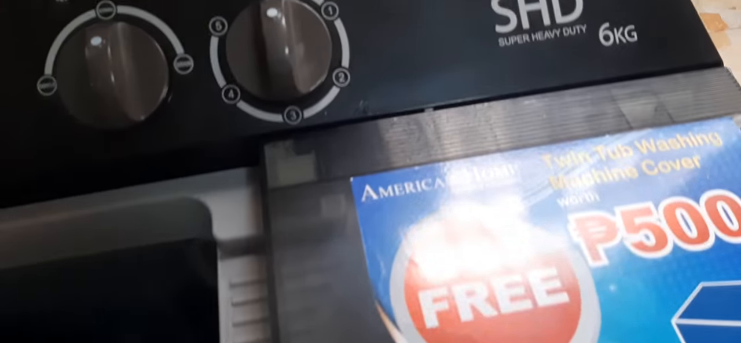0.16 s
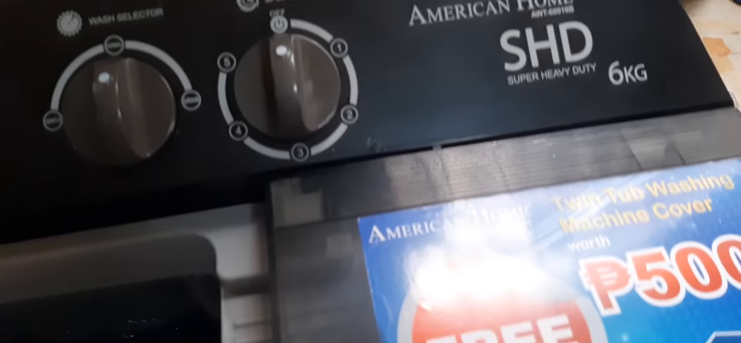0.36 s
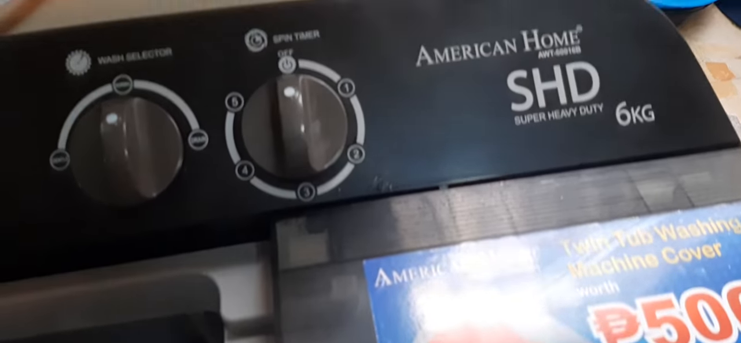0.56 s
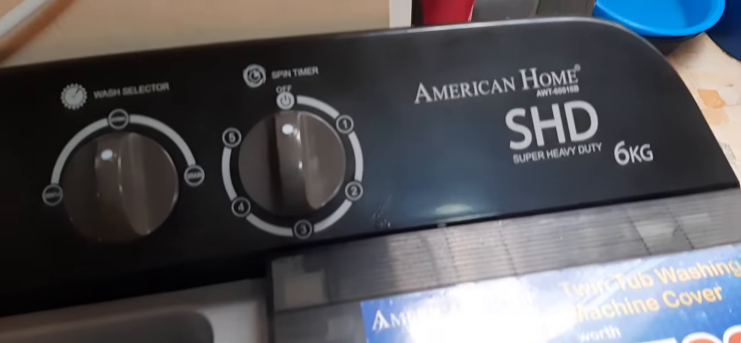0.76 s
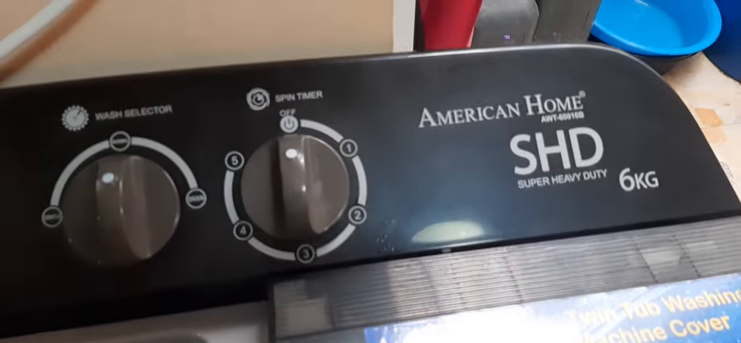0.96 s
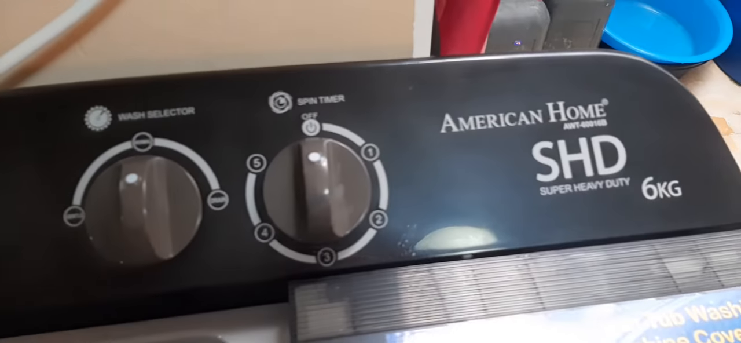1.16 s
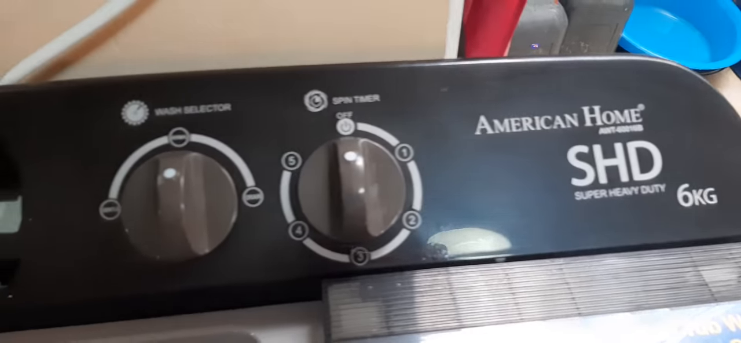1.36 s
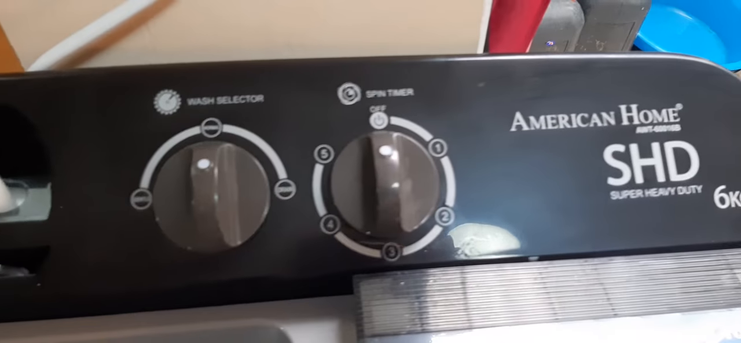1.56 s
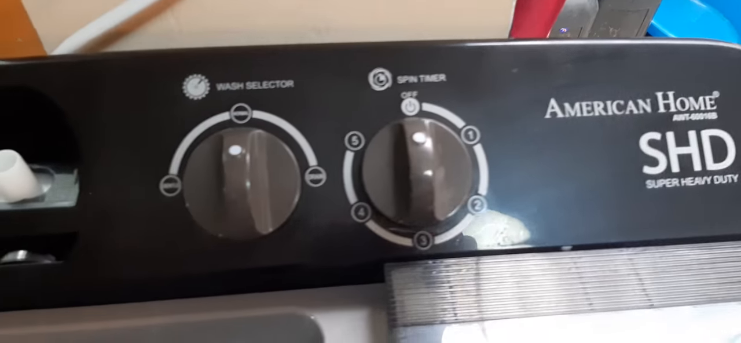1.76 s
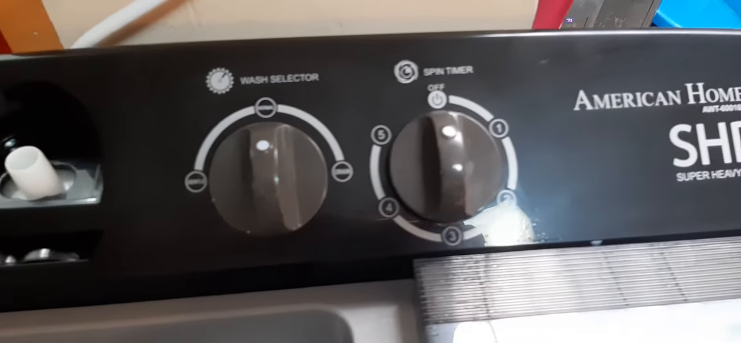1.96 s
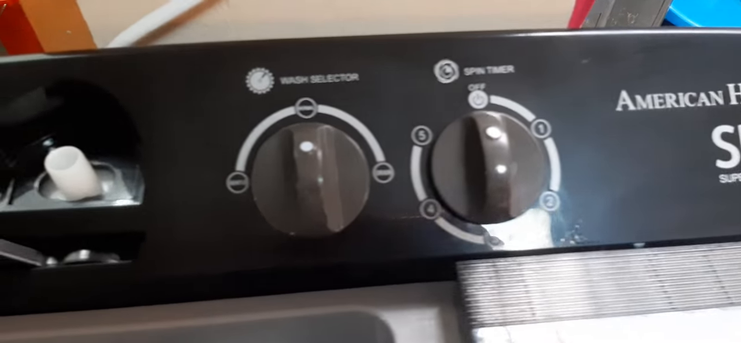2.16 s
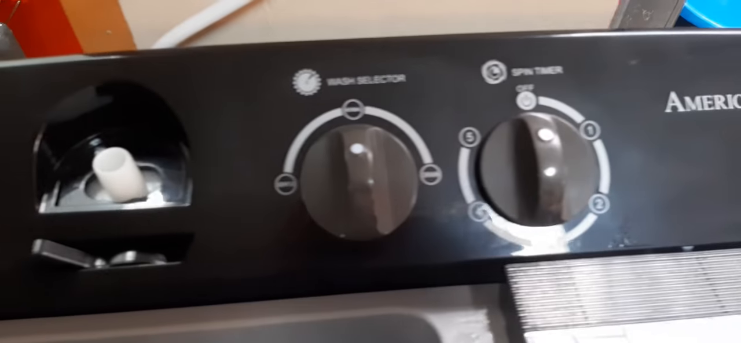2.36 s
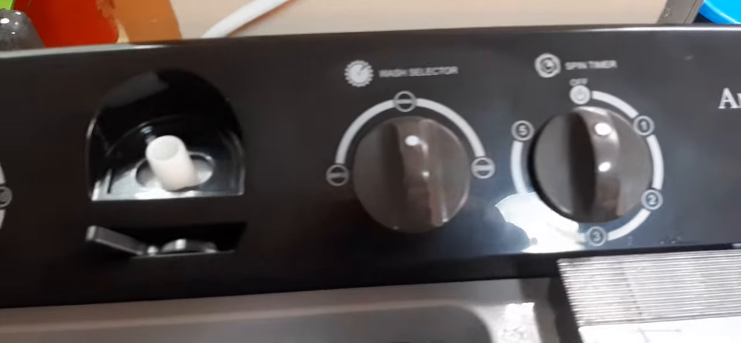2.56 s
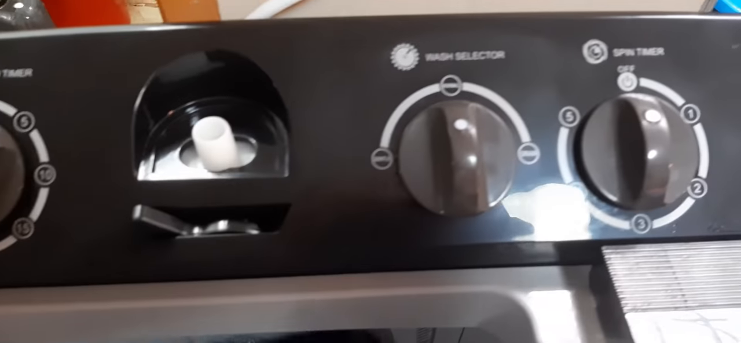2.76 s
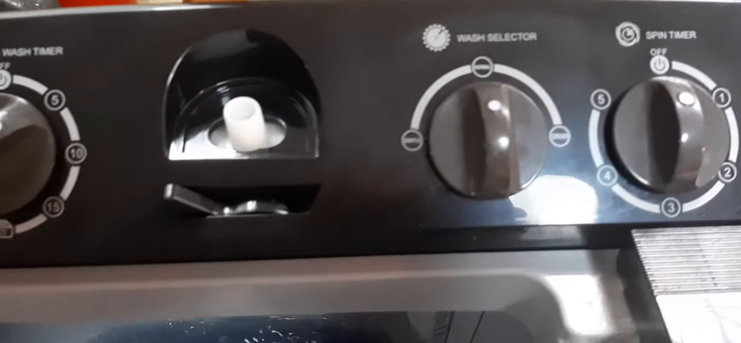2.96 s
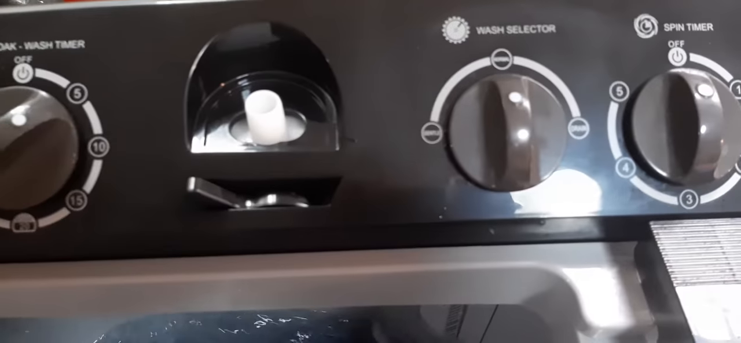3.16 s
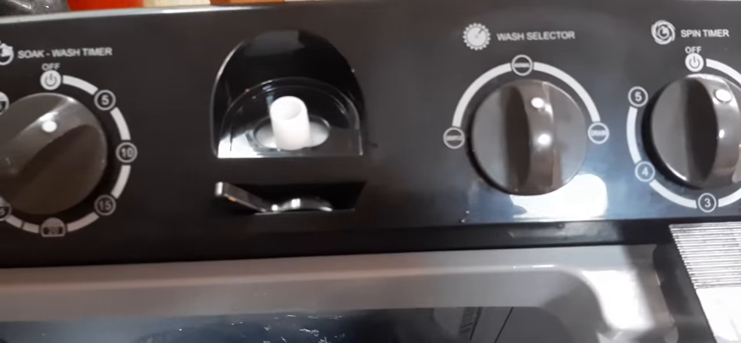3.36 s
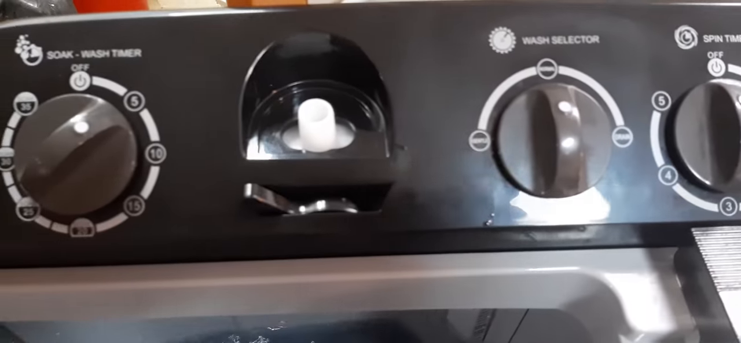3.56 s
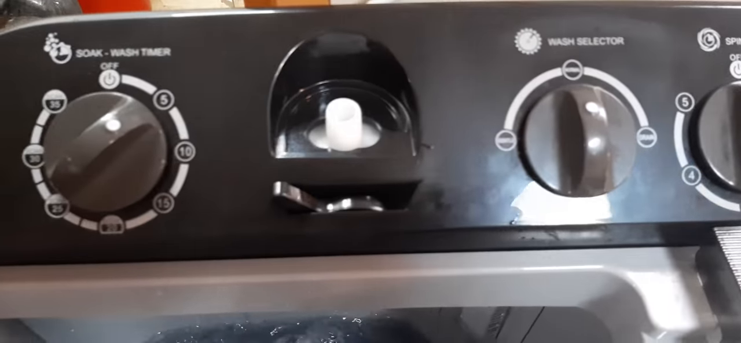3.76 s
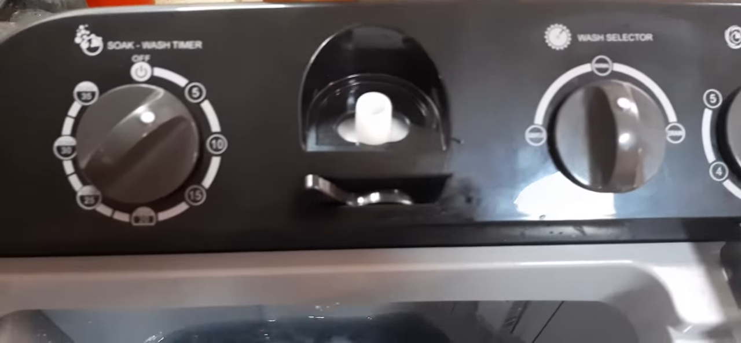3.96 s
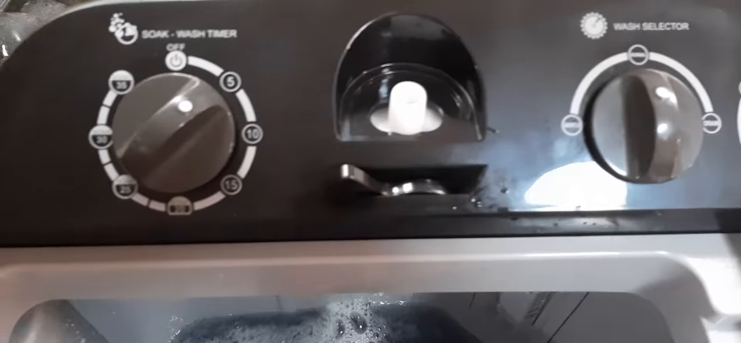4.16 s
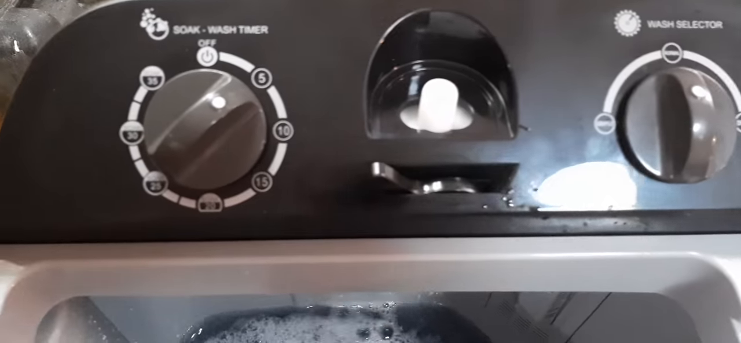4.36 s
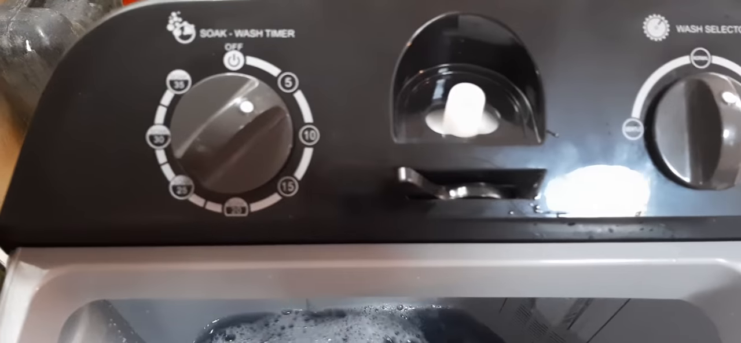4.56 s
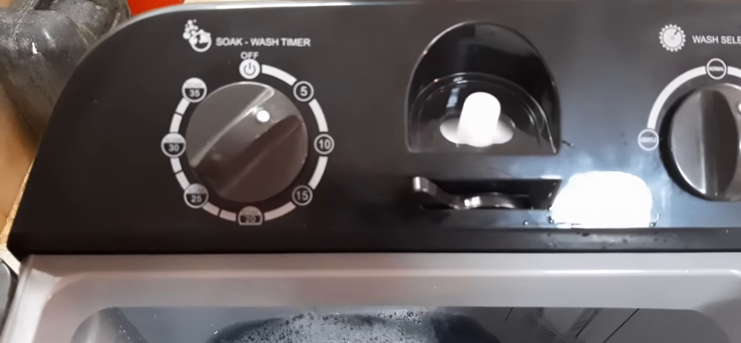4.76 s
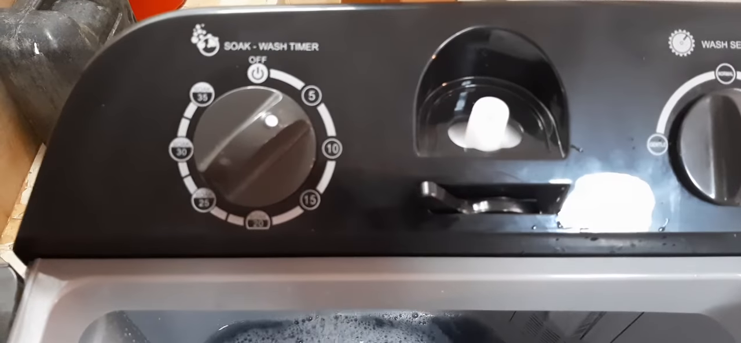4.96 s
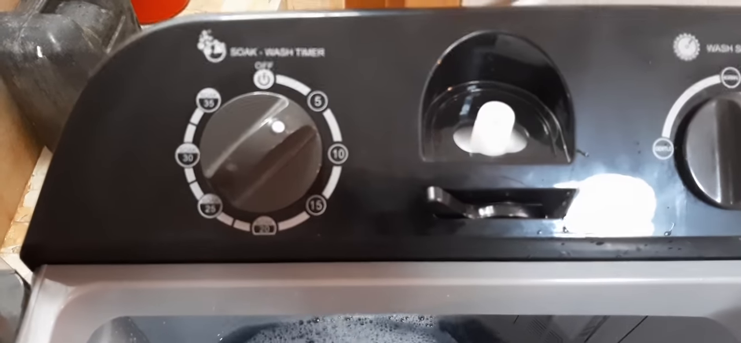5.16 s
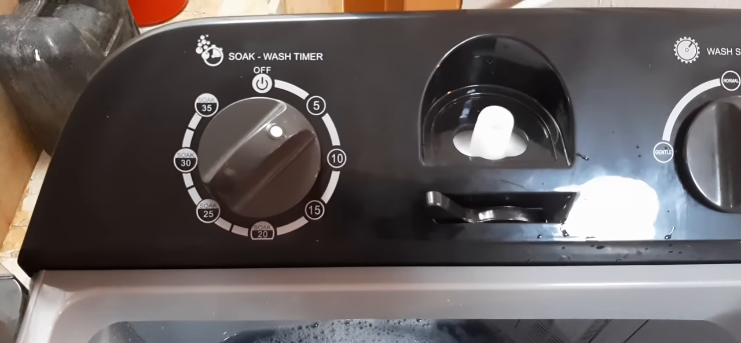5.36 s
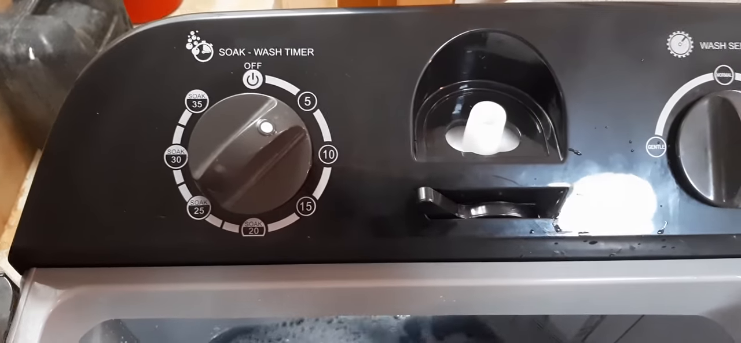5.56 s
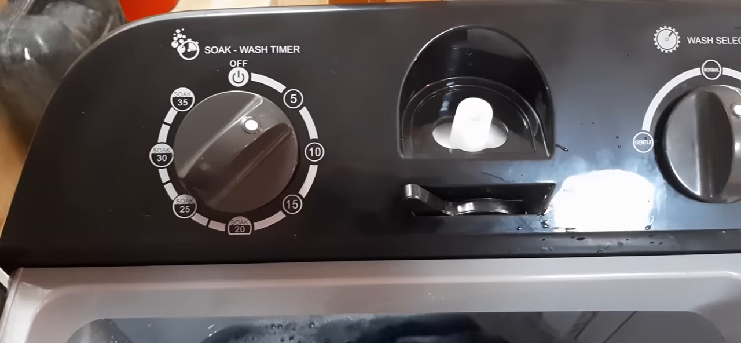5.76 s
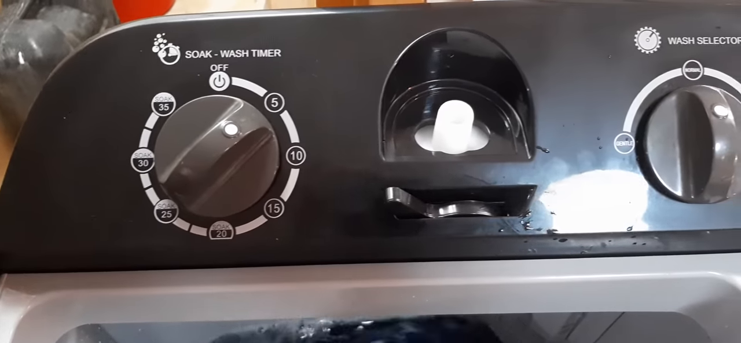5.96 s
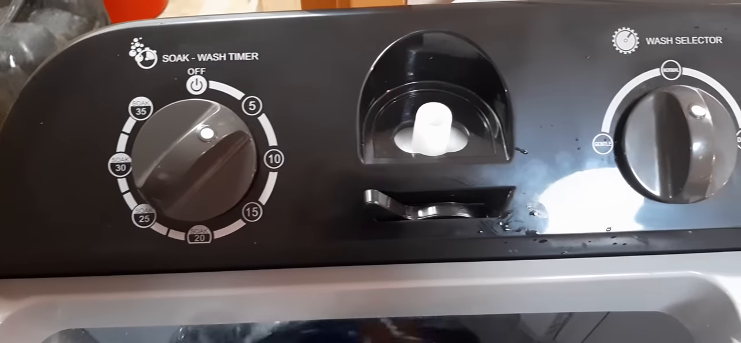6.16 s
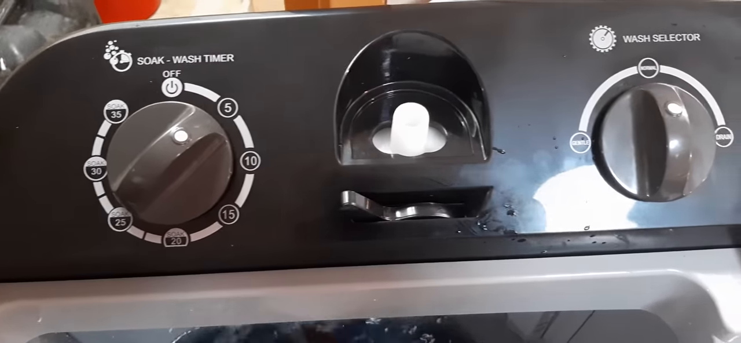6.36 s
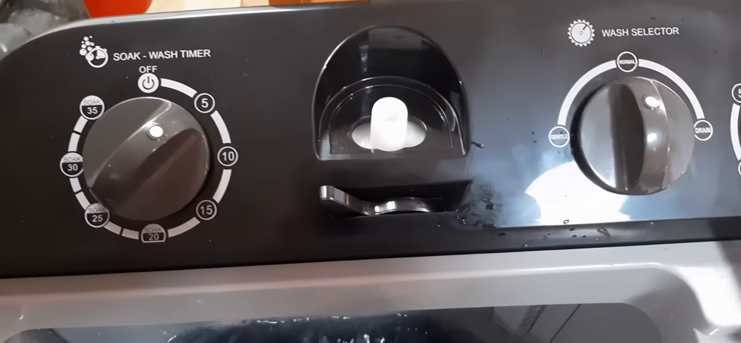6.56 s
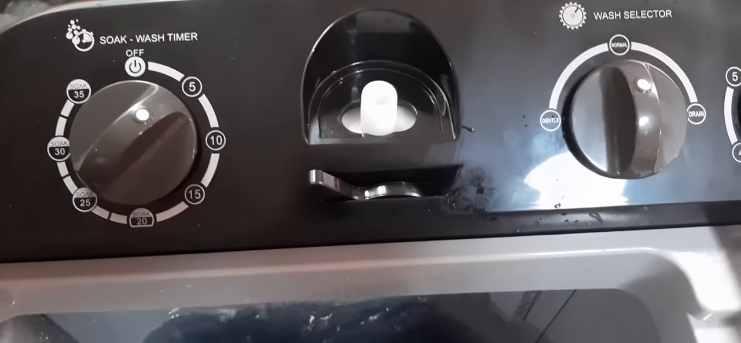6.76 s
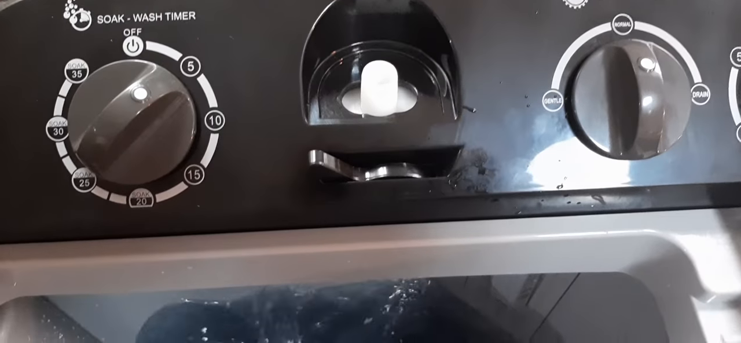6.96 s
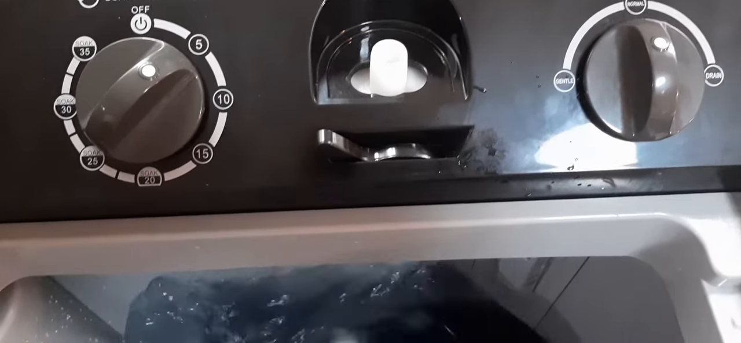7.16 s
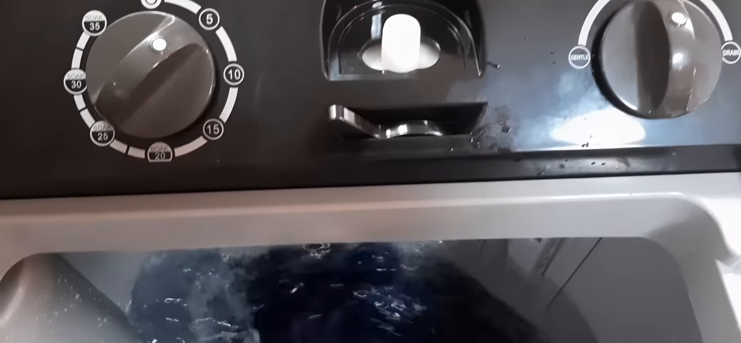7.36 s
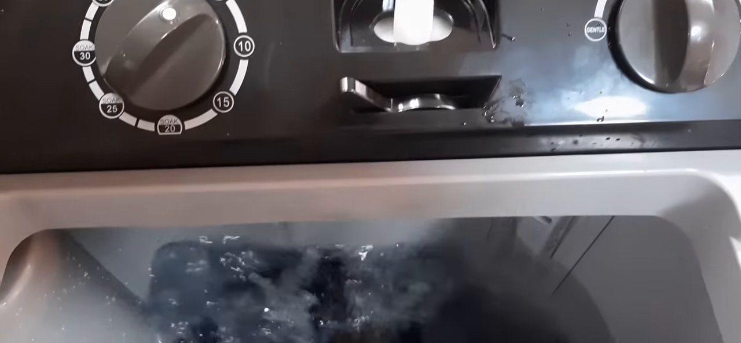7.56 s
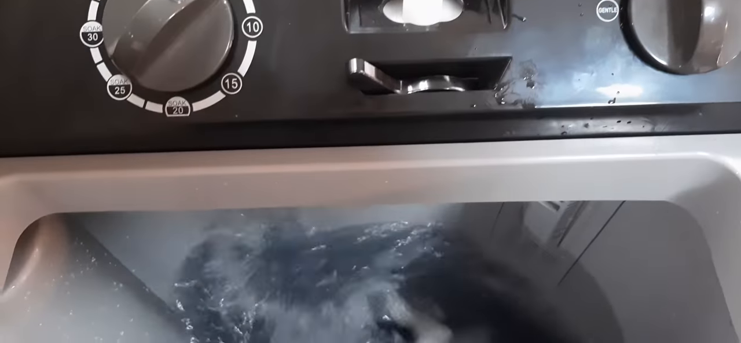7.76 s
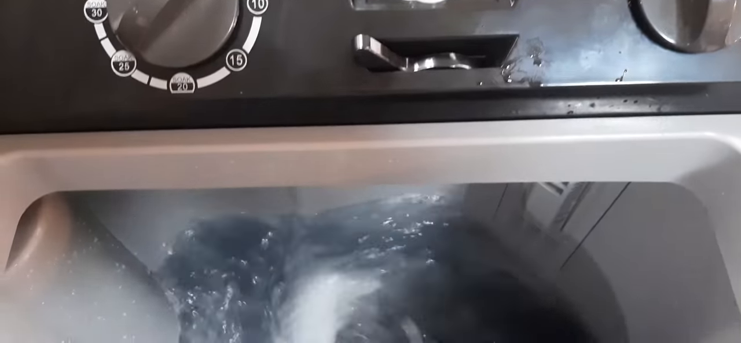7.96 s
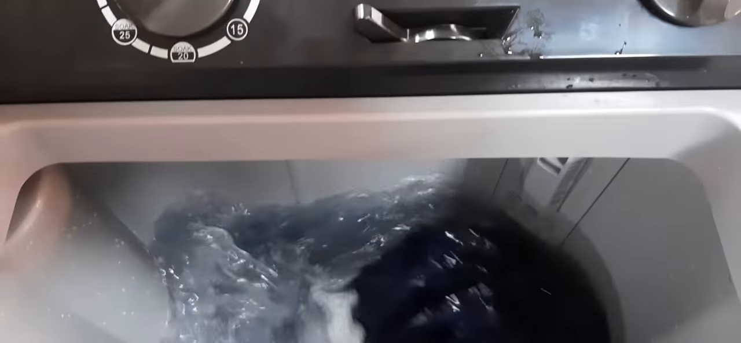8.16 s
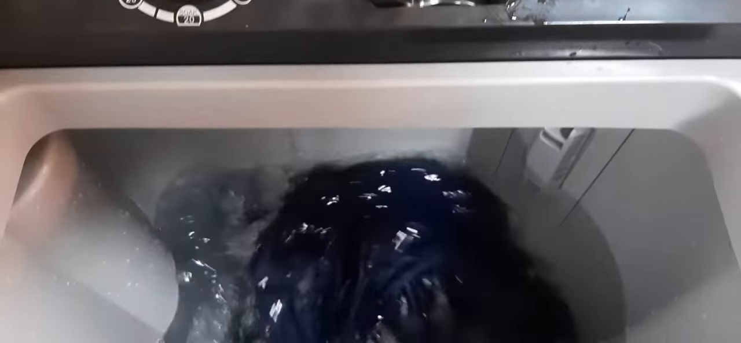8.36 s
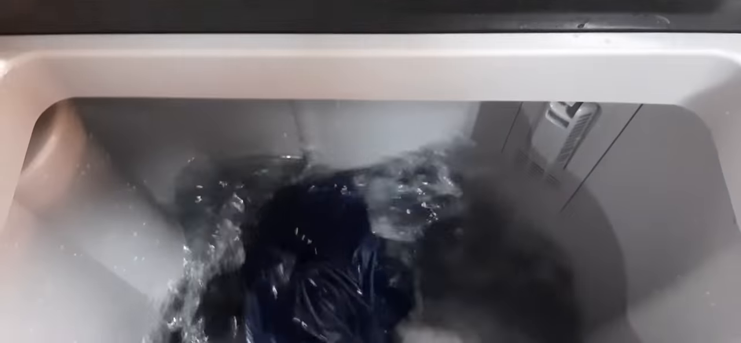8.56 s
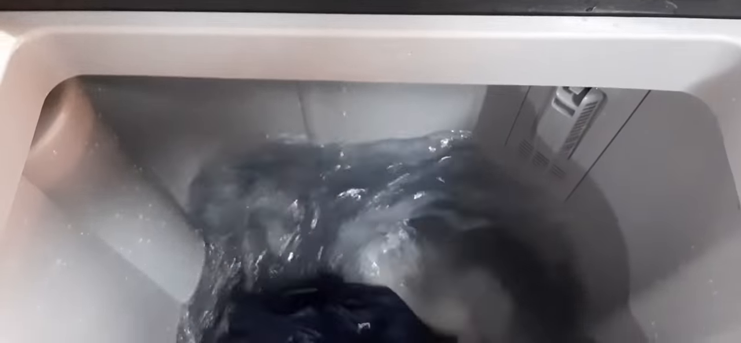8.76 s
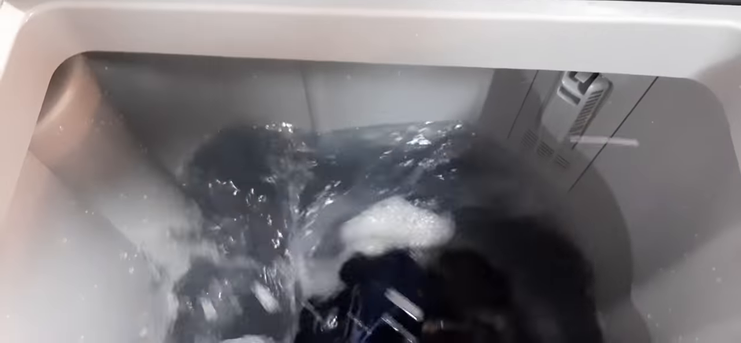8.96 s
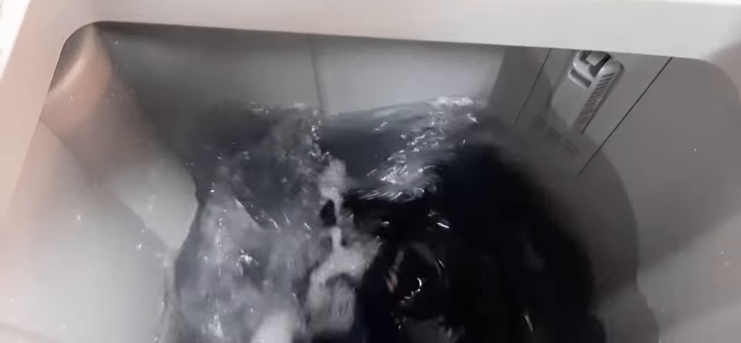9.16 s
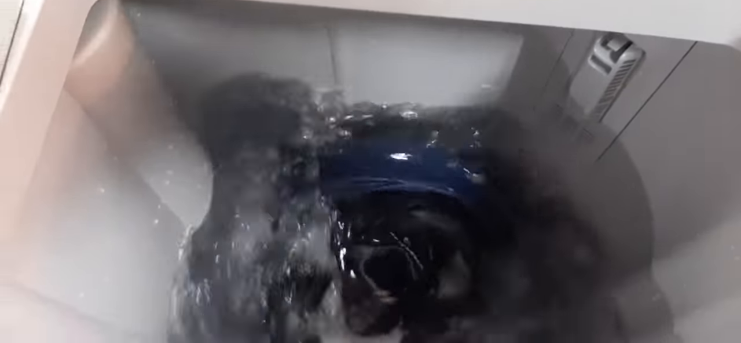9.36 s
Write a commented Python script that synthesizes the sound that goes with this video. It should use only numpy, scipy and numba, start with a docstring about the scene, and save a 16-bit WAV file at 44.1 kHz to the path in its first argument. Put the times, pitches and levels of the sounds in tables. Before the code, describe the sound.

Sudsy water slaps and gurgles above a low throbbing motor, settles during a ticking pause, then the motor restarts and the churn grows heavy and close.

```python
"""Laundry: a top-loading washing machine heard from just above its panel. The motor, summed sines at twice the
mains rate with sidebands, hums and throbs; it stops, the water (damped sine bubbles over shaped noise)
settles over the ringing ticks of a spring timer. The motor then starts the other way and the water builds
up to a splashing churn as the microphone tips down into the tub. Cabinet boom and room air are shaped noise."""
import sys
import numpy as np
from scipy import signal
from scipy.fft import rfft, irfft, next_fast_len
from scipy.io import wavfile
from scipy.ndimage import uniform_filter1d
from numba import njit

SR = 44100
rng = np.random.default_rng(int(sys.argv[2]) if len(sys.argv) > 2 else 0)


def generate_wav(sig):
    """Save sig (samples, or channels by samples) to the path in sys.argv[1] as 16-bit PCM at SR."""
    pcm = np.round(np.clip(np.atleast_2d(sig).T, -1, 1) * 32767).astype(np.int16)
    wavfile.write(sys.argv[1], SR, pcm)


N = 414981
T = np.arange(N) / SR

# motor runs: on t/s, off t/s, time of fullest throb t/s, left re right level/dB, lag of lower lines/rad
MOTOR_RUNS = [(-.5, 2.73, 2.665, 1, 2.04), (5.032, 10, 5.91, -1.5, 0.77)]
# churn in the tub: t/s, splash level/dB, spray level/dB
CHURN_LEVELS = [(0, -34.5, -41.5), (.15, -32, -37), (.27, -35.5, -39), (.56, -36.5, -41), (.9, -32, -38),
                (1.0, -37.5, -42), (1.2, -33.5, -41.5), (1.35, -31, -37), (1.55, -35, -39.5),
                (1.97, -32.5, -41), (2.03, -32.5, -36), (2.3, -31.5, -38), (2.6, -34.5, -40),
                (2.75, -31.5, -36.5), (2.98, -34, -44), (3.2, -32, -37.5), (3.34, -37, -42.5),
                (3.4, -39, -55.5), (3.47, -40.5, -46.5), (3.54, -45.5, -53.5), (3.68, -45, -52.5),
                (3.75, -59.5, -58.5), (5.02, -57.5, -63), (5.13, -48, -58), (5.2, -41.5, -58),
                (5.33, -47.5, -59), (5.45, -51, -63.5), (6.1, -42.5, -55), (6.75, -38.5, -47),
                (6.87, -31, -42), (6.96, -37.5, -46.5), (7.08, -26.5, -34), (7.22, -25.5, -31.5),
                (7.39, -26.5, -32), (7.45, -25.5, -33), (7.73, -23.5, -31), (7.79, -32.5, -40),
                (7.87, -26.5, -32), (8.3, -25.5, -33), (8.4, -31, -35.5), (8.66, -25, -35),
                (8.74, -33.5, -40.5), (8.9, -28, -33.5), (9.0, -33.5, -42), (9.17, -24, -32.5),
                (9.26, -31.5, -35), (9.4, -27.5, -35)]
# spectra of small bubbles, airborne spray and bursting foam: f/Hz, relative level/dB per Hz
SPLASH_SPECTRUM = [(800, -20), (1300, -11.5), (2000, -6), (2800, -6), (3300, -22.5), (4500, -21)]
SPRAY_SPECTRUM = [(2900, -2), (3440, -6), (4250, -2.5), (4790, -5), (5880, -4.5), (6630, -9), (8310, -24.5),
                  (9000, -36)]
FOAM_SPECTRUM = [(7000, -7.5), (8300, -4.5), (10900, 1), (12500, 2.5), (14500, -2.5), (15800, -5)]
LANDING_S = .007  # drops land over this time


def undb(db):
    """dB to gain."""
    return 10 ** (np.asarray(db) / 20)


def unit(x):
    """Scaled to rms 1."""
    return x / np.sqrt(np.mean(x ** 2))


def columns(table):
    """Columns of a table interpolated from its first column, t/s, to the sample grid."""
    s, *values = np.transpose(table)
    return [np.interp(T, s, v) for v in values]


def colour(x, points):
    """Shapes the spectrum by (f/Hz, level/dB) points on a log frequency axis; silent below the first."""
    size = next_fast_len(N)
    hz, db = np.transpose(points)
    log_hz = np.log(np.arange(size // 2 + 1) * SR / size + 1)
    gain = undb(np.interp(log_hz, np.log(hz), db, -120, db[-1] - 20))
    return irfft(rfft(x, size) * gain, size)[..., :N]


def walk(rate_hz):
    """Random levels held 1 / rate_hz and smoothed twice; rms 1."""
    hold = int(SR / rate_hz)
    steps = np.repeat(rng.standard_normal(N // hold + 1), hold)
    smooth = uniform_filter1d(uniform_filter1d(steps, hold), hold)
    return unit(smooth[:N])


def noise_pair(alike):
    """Left and right noise that share a part."""
    share = np.clip(alike, 0, 1)
    common, left, right = rng.standard_normal((3, N))
    return np.sqrt(share) * common + np.sqrt(1 - share) * np.array([left, right])


@njit
def ring(rows, n, sr):
    """Damped sines: start/samples, f/Hz, t60/s, glide share, left and right gain, right lag/samples, rise/s."""
    out = np.zeros((2, n + 64))
    for r in rows:
        start, length, lag = int(r[0]), int(r[2] * sr), int(r[6])
        fade = 1000. ** (-1. / (length + 1))
        rise = np.exp(-1. / (r[7] * sr))
        phase, size, gap = 0., 1., 1.
        for i in range(min(length, n - start)):
            phase += 2 * np.pi * r[1] * (1 + r[3] * i / length) / sr
            size *= fade
            gap *= rise
            v = size * (1 - gap) * np.sin(phase)
            out[0, start + i] += r[4] * v
            out[1, start + i + lag] += r[5] * v
    return out[:, :n]


def bubbles(count, lo_hz, hi_hz, cycles, spread_db, glide, busy):
    """Bubbles of scattered pitch, size and place, born in clumps where the water is busy; each rises in pitch."""
    at, pitch, size, life, place, pan = rng.random((count, 6)).T
    start = np.searchsorted(np.cumsum(busy) / busy.sum(), at)
    hz = lo_hz * (hi_hz / lo_hz) ** pitch
    gain = undb(np.minimum(-spread_db * np.log(1 - size), 16))
    side = undb(4 * (pan - .5))
    t60_s = cycles * (0.5 + life) / hz
    rows = [start, hz, t60_s, glide * life, gain * side, gain / side, 14 * place, 0.69 / hz]
    return unit(ring(np.column_stack(rows), N, SR))


def bursts(s, db, t60_s, rise_s):
    """Envelope of quick onsets with an exponential tail."""
    spikes = np.zeros(N)
    np.add.at(spikes, (np.asarray(s) * SR).astype(int), undb(db))
    tail = signal.lfilter([1], [1, -1000 ** (-1 / (t60_s * SR))], spikes)
    return uniform_filter1d(tail, 2 * int(rise_s * SR / 2) + 1)


def power(on_s, off_s):
    """The cabinet takes a moment to build up and rings off quickly."""
    rise_s, fall_s = .07, .03
    build = 1 - np.exp(-np.clip(T - on_s, 0, None) / rise_s)
    return build * np.exp(-np.clip(T - off_s, 0, None) / fall_s)


def room():
    """Quiet household background: shaped noise with a few steady hum lines."""
    # air: f/Hz, relative level/dB per Hz
    air_spectrum = [(15, -35), (25, -19), (102, 0), (241, 5.5), (333, -8), (555, 5.5), (652, -21),
                    (746, -4), (1180, -25.5), (2020, -10), (2870, -12), (3470, -26), (7580, -27),
                    (12300, -19), (15700, -32)]
    # household hum: f/Hz, rms level/dB
    hum_lines = [(59.2, -61), (107.7, -57.5), (187, -59), (247.6, -57.5), (403.7, -61.5), (581.4, -65.5)]
    air_db, waver_db = -51.5, 1.5
    air = unit(colour(noise_pair(0.43), air_spectrum)) * undb(air_db + waver_db / 3 * walk(7.0))
    hum = 0
    for hz, db in hum_lines:
        gain = np.sqrt(2) * undb(db + waver_db * walk(7.0))
        hum = hum + gain * np.sin(2 * np.pi * hz * T + 1.0 * walk(5.8))
    return air + hum


def timer():
    """Each tick and tock is a short rattle of contacts that rings the timer case."""
    # numbers of the ticks whose times are given; beats between are even
    pace_marks = [*range(17), 18, 24, 26, 29, 32, 36]
    # those ticks: t/s, level/dB
    pace = [(3.768, -39), (3.846, -40.5), (3.9224, -39.5), (4.001, -39), (4.076, -37.5), (4.154, -39.5),
            (4.2316, -33), (4.309, -37), (4.384, -34.5), (4.471, -32), (4.556, -34), (4.6335, -33),
            (4.708, -31.5), (4.7837, -33), (4.857, -38.5), (4.934, -33.5), (5.0021, -33), (5.151, -32.5),
            (5.5926, -38.5), (5.735, -33), (5.9573, -36), (6.1848, -30), (6.48, -33)]
    # case modes: f/Hz, level/dB, t60/s
    case_modes = [(544, -4.5, 0.11), (1720, 1.5, 0.027), (2007, 2.5, 0.045), (2310, -3, 0.048),
                  (2480, 2, 0.039), (2800, -1.5, 0.037), (2930, -3.5, 0.029), (3970, -24, 0.02)]
    # escapement scrape: f/Hz, relative level/dB per Hz
    scrape_spectrum = [(3000, 6), (4200, -5), (5700, 0.5), (7500, -12), (11000, -5), (14000, -11)]
    tock_at, tock_db, scatter_db = 0.5, -6, 0.5  # weaker return beat: share of period, level re tick
    switch_s, switch_db = 5.0323, -28  # the timer's contact snaps the motor on
    tick_tilt_db, tock_tilt_db = -0.5, -12  # per octave re 2.4 kHz; the second adds to the return beat
    # contacts, bright then duller: delay/s, level/dB, tilt/dB per octave
    contacts = [(0, 8, 20), (.003, 3, 10), (.009, -2, -8)]

    beat = np.arange(2 * pace_marks[-1] + 1)
    is_tock = beat % 2
    number = beat // 2 + tock_at * is_tock
    s, db = (np.interp(number, pace_marks, c) for c in np.transpose(pace))
    db = db + tock_db * is_tock + scatter_db * rng.standard_normal(len(beat))
    s, db, is_tock = np.append(s, switch_s), np.append(db, switch_db), np.append(is_tock, 0)
    rows = []
    for at, beat_db, tock in zip(s, db, is_tock):
        for late_s, contact_db, contact_tilt_db in contacts:
            for hz, mode_db, t60_s in case_modes:
                detune, left_db, right_db, jitter = rng.standard_normal(4)
                octaves = np.log2(np.clip(hz, 1500, 2900) / 2400)
                tilt_db = (tick_tilt_db + contact_tilt_db + tock * tock_tilt_db) * octaves
                level_db = beat_db - 16.5 + contact_db + mode_db + tilt_db
                gain = undb(level_db + 2.0 * np.array([left_db, right_db]))
                start = (at + late_s + 0.00147 * abs(jitter)) * SR
                rows.append([start, hz * (1 + 0.012 * detune), t60_s, 0, *gain, 0, .0008])
    # strong ticks carry a bright scrape of the escapement wheel
    scrape = unit(colour(noise_pair(0.18), scrape_spectrum))
    scrape = scrape * bursts(s, 1.7 * (db + 38.0) - 54, t60_s=0.08, rise_s=.002)
    # the switch adds a fizz of spark
    spark = unit(colour(noise_pair(0.12), FOAM_SPECTRUM))
    spark = spark * bursts([switch_s], switch_db - 4.0, t60_s=0.052, rise_s=.003)
    return ring(np.array(rows), N, SR) + scrape + spark


def rumble():
    """The plastic cabinet booms under the motor, most at start-up, and under the sloshing water."""
    # boom: f/Hz, relative level/dB per Hz
    boom_spectrum = [(40, -16), (60, -19), (100, -3.5), (148, -9.5), (166, 2.5), (177, -2.5), (190, -2.5),
                     (210, -7.5), (238, -8.5), (280, -13.5), (360, -13.5), (430, -21.5), (600, -24.5),
                     (1000, -34), (2000, -43.5)]
    running_db, slosh_db = -29.5, -6  # slosh re splash
    kick_db, kick_s = 5, 0.61  # extra at start-up, its decay
    grip_s, idle_share = .11, .4  # belt grips this long after switch-on; share of boom before that
    drive = 0
    for on, off, *_ in MOTOR_RUNS:
        load = idle_share * power(on, off) + (1 - idle_share) * power(on + grip_s, off)
        drive = drive + load * undb(running_db + kick_db * np.exp(-np.abs(T - on) / kick_s))
    splash_db, _ = columns(CHURN_LEVELS)
    level = np.hypot(drive, undb(splash_db + slosh_db))
    return unit(colour(noise_pair(0.79), boom_spectrum)) * level * undb(0.85 * walk(14))


def thuds():
    """Waves knock the tub wall and ring the low modes of the tub."""
    # last waves before the pause: t/s, level/dB
    knocks = [(2.919, -29), (2.959, -26), (3.14, -35), (3.247, -21), (3.4, -29), (3.433, -23.5)]
    # tub modes: f/Hz, level/dB, t60/s
    tub_modes = [(172.4, 0.5, 0.11), (112, -10, 0.11), (260, -9, 0.08)]
    rows = []
    for s, db in knocks:
        for hz, mode_db, t60_s in tub_modes:
            gain = undb(db + mode_db)
            rows.append([s * SR, hz, t60_s, 0, gain, gain, 0, .006])
    return ring(np.array(rows), N, SR)


def drops():
    """Thrown water lands with a short hiss, some in the spray range, some higher in the foam."""
    # drops that stand out: t/s, spray level/dB, foam level/dB
    landings = [(0.0994, -32, -34), (0.579, -27.5, -39), (0.7991, -32, -42), (0.9532, -34, -56),
                (1.091, -29, -48), (1.3094, -38, -34), (1.366, -26.5, -36), (1.455, -40, -37),
                (1.5913, -32, -36), (2, -28.5, -41), (2.138, -29, -52), (2.3975, -32, -42),
                (3.102, -41, -36), (3.158, -25.5, -46), (3.279, -26.5, -32.5), (3.5733, -41, -50),
                (3.596, -34, -46), (5.777, -35, -35.5), (5.9604, -42, -52), (6.082, -36, -43.5),
                (6.1475, -37, -47), (6.236, -31.5, -42.5), (6.4403, -41, -49), (6.4804, -38, -44),
                (6.5415, -42, -40), (6.6134, -35, -41), (6.806, -31.5, -56), (7.0546, -20, -34),
                (7.1764, -25, -27.5), (7.3756, -25, -33), (7.5673, -21, -35), (7.6707, -35, -29.5),
                (7.735, -26, -32), (8.1364, -30, -30.5), (8.9286, -28, -46), (9.191, -38, -36)]
    s, spray_db, foam_db = np.transpose(landings)
    spray = unit(colour(noise_pair(0.13), SPRAY_SPECTRUM))
    spray = spray * bursts(s, spray_db + 1.5, t60_s=0.061, rise_s=LANDING_S)
    foam = unit(colour(noise_pair(0.093), FOAM_SPECTRUM))
    foam = foam * bursts(s, foam_db + 8.0, t60_s=0.059, rise_s=LANDING_S)
    return spray + foam


def slaps():
    """Each slap clicks and traps a bubble that rings with a pitch glide, then a smaller one, in a short splash."""
    # loud slaps of water on the tub: t/s, level/dB, bubble f/Hz, pitch glide as a share
    hits = [(0.103, -16, 2560, 0.11), (0.18, -20.5, 1080, -0.069), (0.2, -21, 2370, -0.16),
            (0.2274, -25.5, 5250, 0.77), (0.3426, -21.5, 2860, 0.18), (0.4194, -26, 2620, -0.19),
            (0.4643, -24, 3500, 0.36), (0.4978, -24, 4060, .1), (0.546, -23, 1033, 0.54),
            (0.5721, -21, 2550, -0.043), (0.7991, -27, 6260, .05), (0.9532, -21.5, 4500, -0.032),
            (1.0455, -20.5, 2860, .05), (1.065, -27, 2720, -0.3), (1.051, -21, 1430, -0.015),
            (1.193, -15, 2260, -0.098), (1.31, -28.5, 2880, -0.026), (1.501, -16.5, 3080, 0.21),
            (1.59, -24, 774, 0.16), (1.5913, -21, 4260, 0.32), (1.8108, -23.5, 3110, 0.089),
            (2.055, -18, 1110, 0.24), (2.139, -25, 6300, 0.48), (2.183, -18.5, 985, -0.0023),
            (2.3984, -22, 5350, 0.67), (2.458, -20, 2300, -0.033), (2.771, -18, 765, 0.17),
            (2.844, -22, 1030, .1), (2.879, -28, 2120, -0.2), (2.911, -20, 1460, 0.34),
            (2.946, -23, 860, 0.2), (2.96, -22, 1290, 0), (3.011, -26, 1480, -0.18),
            (3.03, -16.5, 2220, 0.24), (3.1, -23, 800, 0.25), (3.148, -16.5, 1320, 0.53),
            (3.16, -21, 1920, .05), (3.18, -18.5, 1670, 0.38), (3.187, -16, 2540, -0.15),
            (3.238, -22, 940, 0), (3.277, -11, 2590, 0), (3.3, -24.5, 704, 0.12), (3.407, -31, 1990, 0.013),
            (3.433, -19.5, 1210, 0.35), (3.462, -18, 1456, -0.029), (3.475, -26, 2250, 0.75),
            (3.496, -23, 1890, -0.38), (3.574, -18.5, 910, -0.49), (3.603, -34, 785, -0.032),
            (5.777, -25, 2830, 0.43), (6.078, -25, 740, 1.9), (6.236, -26, 694, 0.97),
            (6.287, -27.5, 1640, -0.61), (6.444, -25, 970, .2), (6.474, -25, 970, 0.63),
            (6.6, -20.5, 1540, -0.16), (6.648, -13, 1990, 0.22), (6.842, -25, 710, -0.049),
            (6.858, -19, 926, .1), (6.988, -14, 874, 2.1), (7.012, -21, 1340, -0.048),
            (7.045, -18.5, 646, 0.55), (7.071, -22, 747, 0.07), (7.098, -14.5, 585, 0.36),
            (7.135, -19, 800, .2), (7.215, -15, 1580, -0.24), (7.24, -13, 2290, 0.12),
            (7.322, -9, 1475, -0.0087), (7.499, -12.5, 2030, -0.11), (7.572, -11, 724, -0.13),
            (7.657, -17, 2200, -0.2), (7.712, -13, 970, 0.041), (7.934, -15, 1050, -0.25),
            (7.994, -14.5, 2640, 0.6), (8.036, -16, 748, 0.62), (8.135, -14, 1850, -0.024),
            (8.24, -15, 885, -0.035), (8.442, -18, 1550, 0.3), (8.465, -12, 1750, 0.26),
            (8.64, -20, 520, .1), (8.81, -24, 497, -0.14), (8.878, -19.5, 624, -0.31),
            (8.896, -16, 1600, .2), (9.184, -14.5, 1410, -0.041), (9.211, -15, 794, 0.37),
            (9.297, -14, 707, 0.65), (9.345, -14.5, 2620, -0.16)]
    # click of first contact: f/Hz
    crack_hz = [1780, 3400, 6040, 11000]
    crack_db = -5.5  # re slap level
    s, db, hz, glide = np.transpose(hits)
    pan, late = rng.random((len(s), 2)).T
    side, gain = undb(5.7 * (pan - .5)), undb(db - 4.5)
    start, zero = s * SR, 0 * s
    t60_s = (30 + 0.012 * hz) / hz
    first = np.column_stack([start, hz, t60_s, glide, gain * side, gain / side, zero, 0.3 / hz])
    second = first * [1, 1.22, 0.6, 0.5, 0.53, 0.48, 1, 1.7]
    second[:, 0] += (0.0082 + 0.021 * late) * SR
    crack = undb(db + crack_db)
    cracks = []
    for f in crack_hz:
        cracks.append(np.column_stack([start, zero + f, zero + 2.4 / f, zero,
                                       crack * side, crack / side, zero, zero + 0.076 / f]))
    splash = unit(colour(noise_pair(0.37), SPLASH_SPECTRUM))
    splash = splash * bursts(s, db - 10, t60_s=0.08, rise_s=0.00072)
    return ring(np.vstack([first, second, *cracks]), N, SR) + splash


def water():
    """Big bubbles gurgle, small ones splash, spray and foam fizz, each over a patchy rush."""
    # gurgle rush: f/Hz, relative level/dB per Hz
    gurgle_spectrum = [(300, -30), (480, -24), (750, 17), (1100, 11), (1500, 9), (2200, -51)]
    gurgle_db = -5.5  # re splash
    wave_db, flicker_db = 0.42, 1.0  # swell of the spray as waves go round the tub; treble flicker
    spatter_count = 420
    splash_db, spray_db = columns(CHURN_LEVELS)
    surge = .7 * walk(22)

    gurgle = bubbles(count=2000, lo_hz=460, hi_hz=1400, cycles=46, spread_db=3, glide=0.12,
                     busy=undb(2.5 * surge + 5 * walk(25)))
    gurgle_rush = unit(colour(noise_pair(0.77), gurgle_spectrum)) * undb(2.9 * surge)
    gurgle = unit(gurgle + 0.71 * gurgle_rush)

    splash = bubbles(count=3800, lo_hz=1256, hi_hz=2930, cycles=80, spread_db=3.5, glide=0.08,
                     busy=undb(2.5 * surge + 5 * walk(35)))
    plops = bubbles(count=1500, lo_hz=890, hi_hz=3070, cycles=22, spread_db=4.0, glide=0.2,
                    busy=undb(4.0 * surge))
    splash_rush = unit(colour(noise_pair(0.56), SPLASH_SPECTRUM)) * undb(2.2 * surge + 1.0 * walk(30))
    splash = unit(splash + 0.55 * plops + .58 * splash_rush)  # bubbles lead

    fizz = bubbles(count=16000, lo_hz=2804, hi_hz=14580, cycles=78, spread_db=4.0, glide=0.18,
                   busy=undb(2.5 * surge + 7 * walk(70)))
    # small droplets land as short hisses on the rush
    at, size = rng.random((spatter_count, 2)).T
    spatter_db = np.minimum(-3.5 * np.log(1 - size), 12) - 9
    spatter = bursts(at * (N - 1) / SR, spatter_db, t60_s=0.11, rise_s=LANDING_S)
    crackle = bubbles(count=2200, lo_hz=3100, hi_hz=13600, cycles=3.2, spread_db=4, glide=0.56,
                      busy=undb(3.0 * surge + 6 * walk(40)))
    hiss = noise_pair(0.052) * (1 + spatter) * undb(1.3 * surge)
    rush = 0.5 * fizz + 0.41 * crackle + hiss
    froth = rush + 1.04 * np.roll(crackle, N // 3, axis=1)  # bursting suds have pops of their own
    spray = unit(colour(rush, SPRAY_SPECTRUM)) * undb(flicker_db * walk(30) + 0.5)
    foam = unit(colour(froth, FOAM_SPECTRUM)) * undb(flicker_db * walk(30) - 2.5)

    low = gurgle * undb(splash_db + gurgle_db) + splash * undb(splash_db)
    return low + (spray + foam) * undb(spray_db + wave_db * walk(10))


def motor():
    """The field pulls at twice the mains rate; an uneven rotor adds lines one throb apart and shakes the frame."""
    # mains line in the cabinet: t/s, level/dB
    mains = [(0, -24), (.4, -30), (.8, -30.5), (1.5, -23.5), (2.2, -25), (2.7, -23), (5.08, -18.5),
             (5.14, -27), (5.155, -16), (5.35, -18.5), (5.7, -22), (6.05, -24.5), (6.3, -20), (6.8, -26.5),
             (7.05, -32), (7.3, -23), (7.75, -35), (8.2, -45), (8.55, -25), (9.4, -28.5)]
    # frame shake: f/Hz, relative level/dB per Hz
    frame_spectrum = [(35, -38), (52, -34), (75, -42), (95, -11), (115, -2), (132, 0), (145, -48)]
    # weaker lines: multiple of hum_hz, multiple of throb_hz, level/dB re upper line
    overtones = [(1, -2, -17), (1, 2, -19), (2, -1, -14), (2, 0, -17), (2, 1, -18), (3, 0, -27)]
    hum_hz, throb_hz, paddle_hz = 119.76, 10.15, 4.1
    upper_mean_db, lower_mean_db, wander_db = -25, -34.5, 0.5  # lines one throb above and below the hum
    (main_db,) = columns(mains)
    frame = undb(-27.5) * unit(colour(noise_pair(0.86), frame_spectrum))
    waver_rad = 0.08 * walk(3.1)
    # the upper line swells with each turn of the paddle
    upper_db = upper_mean_db + wander_db * walk(2.5) + 1.0 * np.sin(2 * np.pi * paddle_hz * T)
    lower_db = lower_mean_db + 2 * wander_db * walk(2.7)
    lines = [(1, 0, main_db), (1, 1, upper_db), (1, -1, lower_db)]
    lines += [(m, k, upper_db + db) for m, k, db in overtones]
    field = 2 * np.pi * hum_hz * T
    out = 0
    for on, off, fullest, pan_db, lag in MOTOR_RUNS:
        throb = 2 * np.pi * throb_hz * (T - fullest) + waver_rad
        hum = 0
        for m, k, db in lines:
            hum = hum + np.sqrt(2) * undb(db) * np.sin(m * field + k * throb - lag * (k < 0))
        out = out + power(on, off) * (hum + frame) * undb([[pan_db / 2], [-pan_db / 2]])
    return out


def scene():
    """Room, timer, machine and water."""
    return room() + timer() + rumble() + thuds() + drops() + slaps() + water() + motor()


def record(dry):
    """Two microphone ports differ in level and phase; deep bass and extreme top are cut."""
    # ports: f/Hz, left re right level/dB, left lead/rad
    ports_table = [(60, 5, -.7), (120, 3.5, -.7), (230, .8, -.27), (400, 0, 0), (700, 2, .1),
                   (1400, 2.2, .7), (2400, 2.2, 1), (4400, -2.6, 1), (8000, 2.4, 1), (16000, 0, 1)]
    bass_cut_hz, top_hz = 45, 15860
    size = next_fast_len(N + SR)
    hz, pan_db, lead_rad = np.transpose(ports_table)
    log_hz = np.log(np.arange(size // 2 + 1) * SR / size + 1)
    level = undb(np.interp(log_hz, np.log(hz), pan_db) / 2)
    half = level * np.exp(.5j * np.interp(log_hz, np.log(hz), lead_rad))
    ports = irfft(rfft(dry, size) * np.array([half, 1 / half]), size)[:, :N]
    ports = signal.sosfilt(signal.butter(2, bass_cut_hz, "high", fs=SR, output="sos"), ports)
    return signal.sosfilt(signal.ellip(12, .2, 80, top_hz, fs=SR, output="sos"), ports)


dry = scene()
out = record(dry)
generate_wav(out)
```